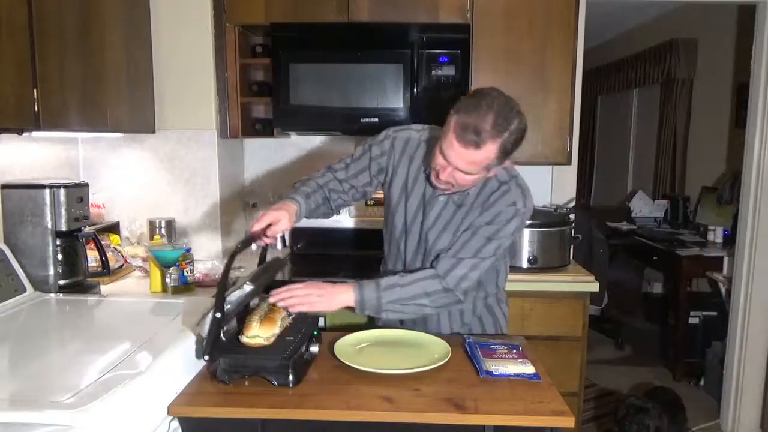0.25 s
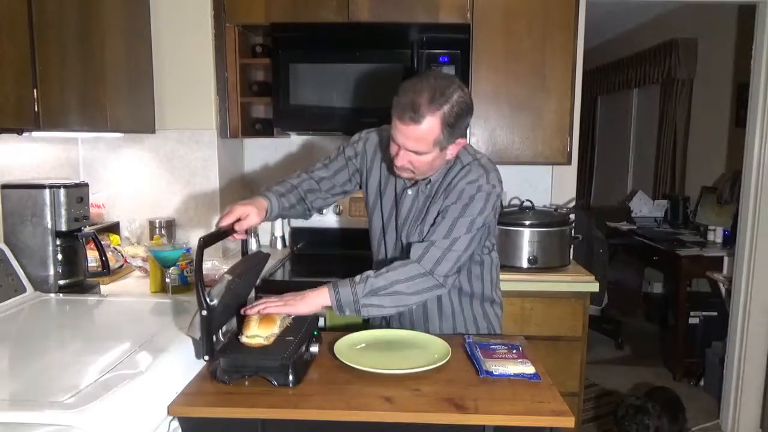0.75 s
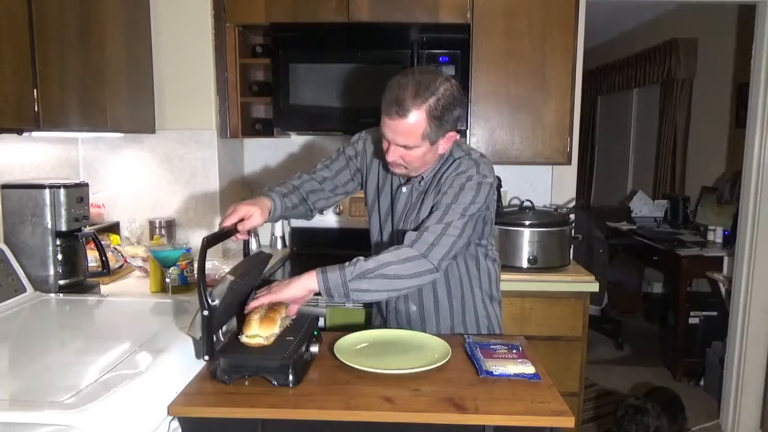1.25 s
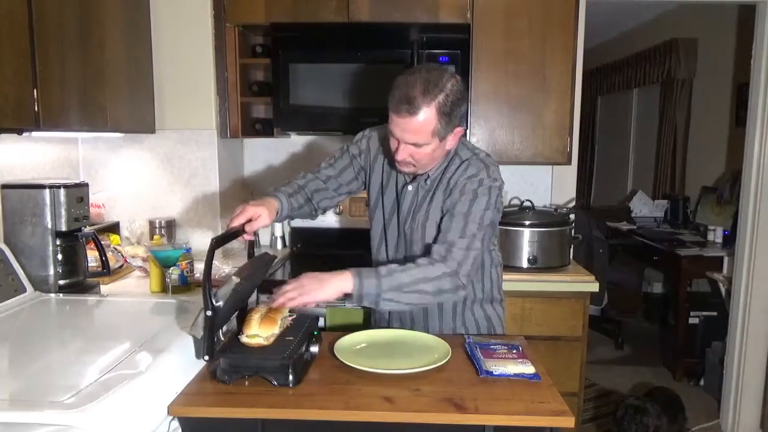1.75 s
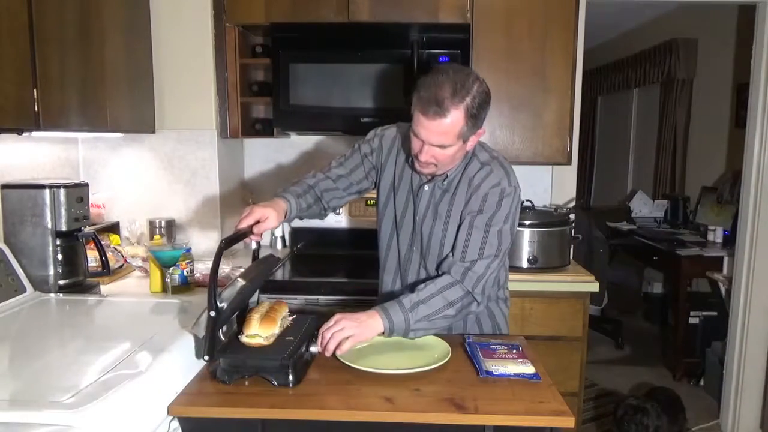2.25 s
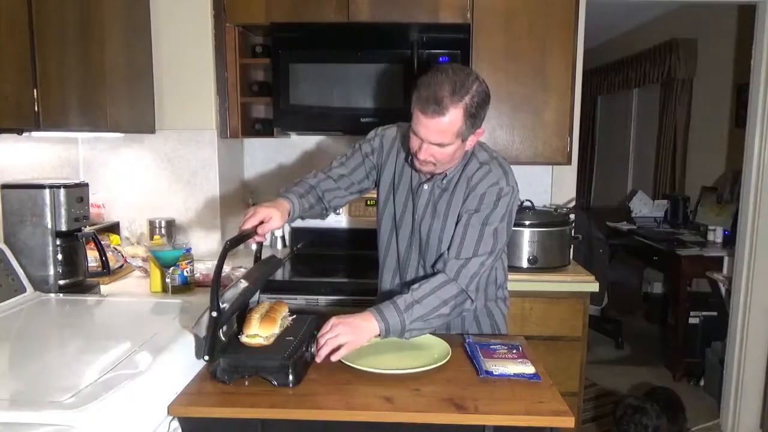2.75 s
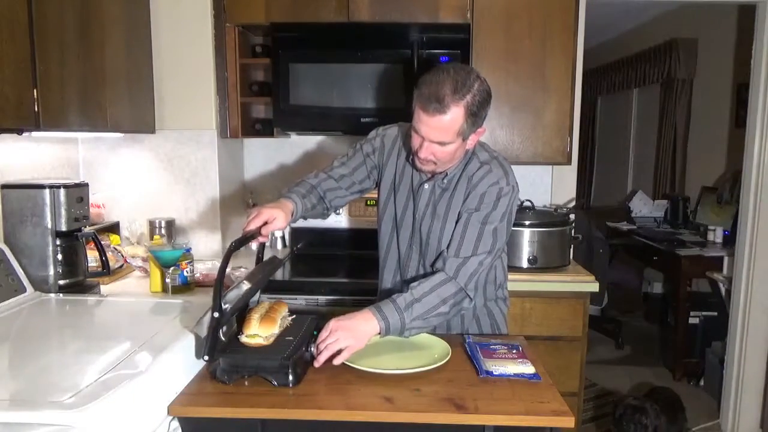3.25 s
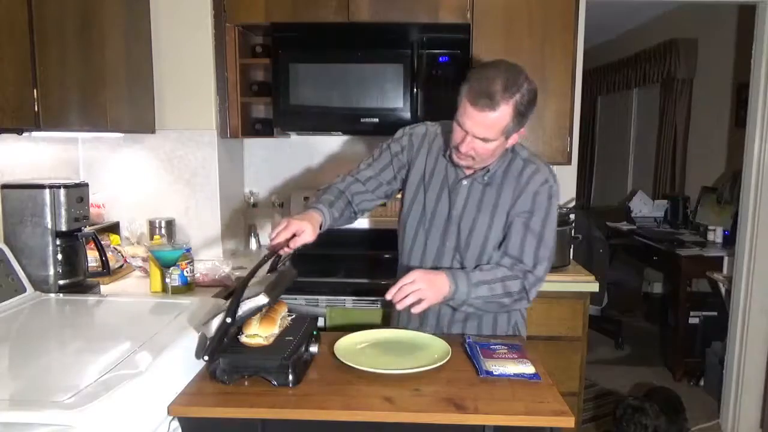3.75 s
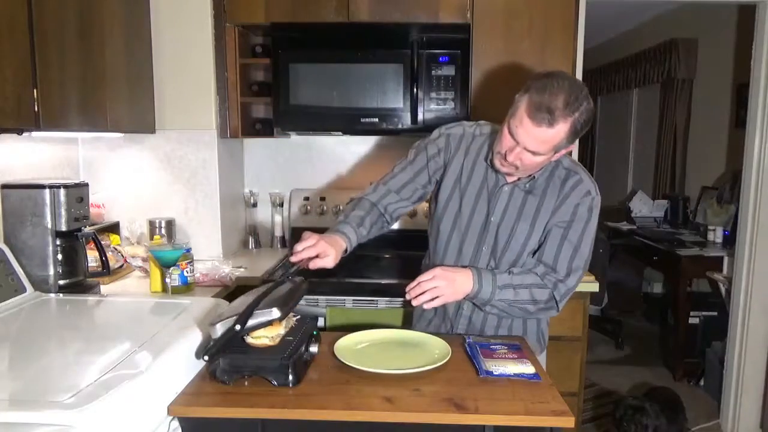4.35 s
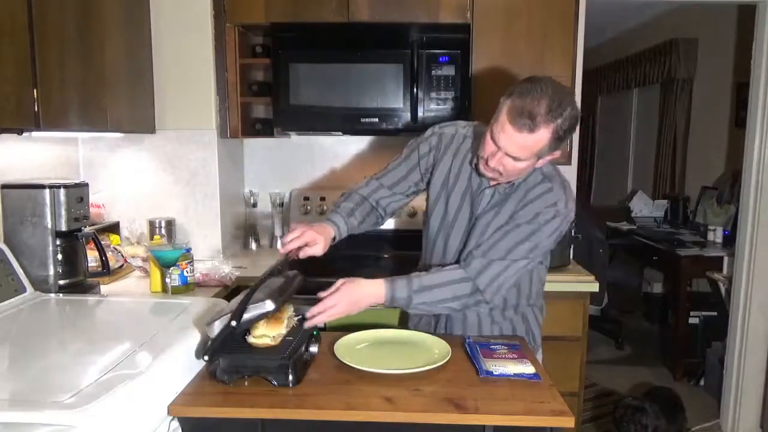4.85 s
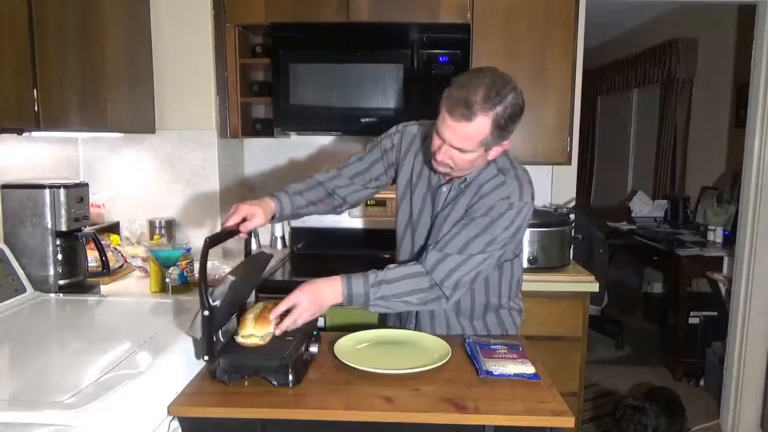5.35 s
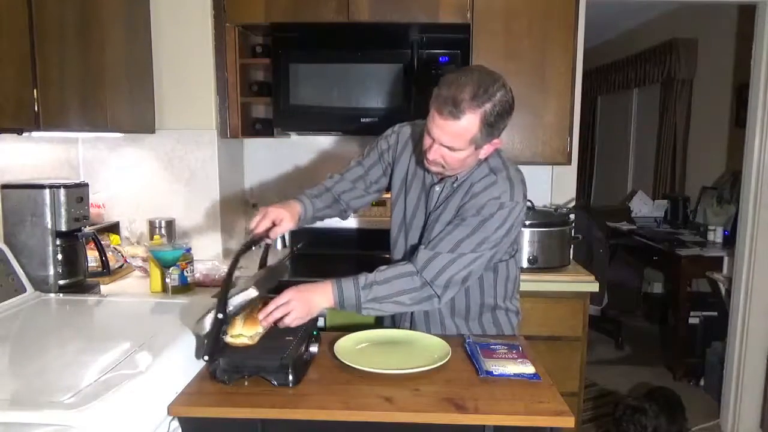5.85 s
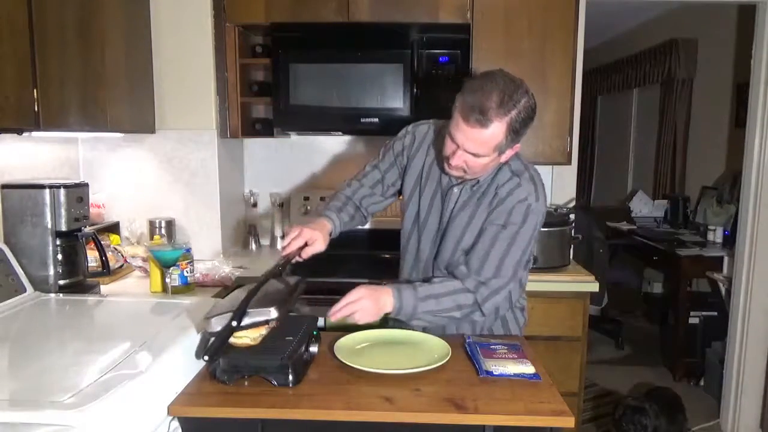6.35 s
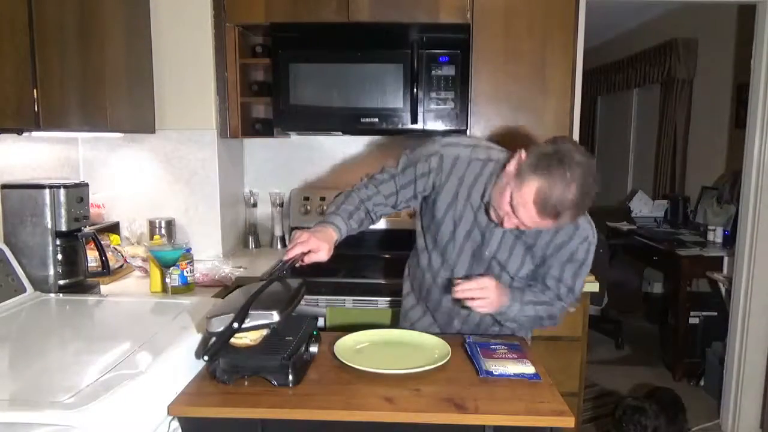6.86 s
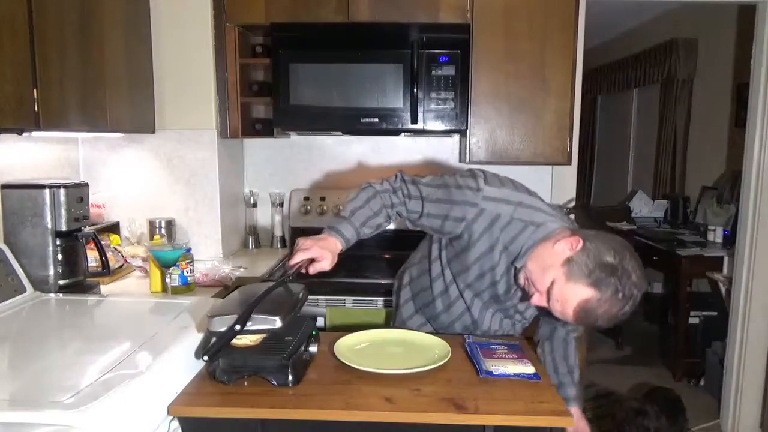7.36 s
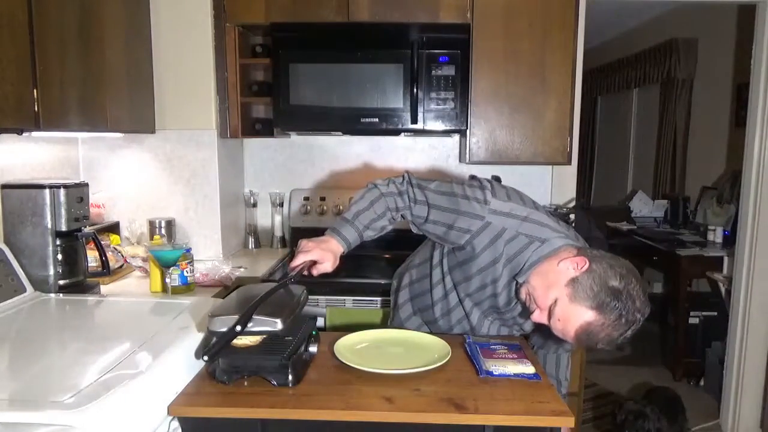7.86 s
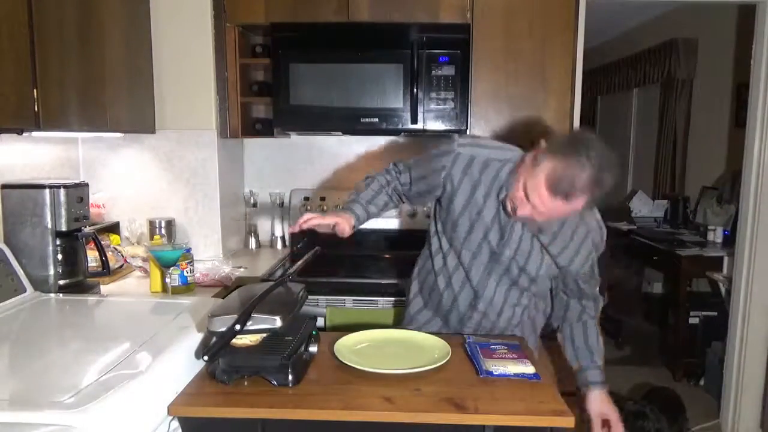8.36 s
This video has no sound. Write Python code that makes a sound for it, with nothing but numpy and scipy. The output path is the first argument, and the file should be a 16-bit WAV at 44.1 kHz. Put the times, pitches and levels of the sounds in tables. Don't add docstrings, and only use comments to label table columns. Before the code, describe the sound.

Heard from about two metres by a small camera whose focus motor chirps very faintly, a sandwich press is handled on a wooden counter. Over constant fan hum come thin clinks, a loud pop, and rapid crisp dial snaps. Then duller lid rattles, a brief metallic ring, soft sizzling and cloth rustle, a second sharp pop, small knocks, and a quiet close with sparse ticks of plastic and fat.

```python
import sys
import numpy as np
from scipy import signal
from scipy.fft import rfft, irfft
from scipy.io import wavfile
from scipy.ndimage import uniform_filter1d

SR = 44100
rng = np.random.default_rng(int(sys.argv[2]) if len(sys.argv) > 2 else 0)


def volts(x):
    e = np.asarray(x, float) / 20
    return 10 ** e


def dump(signal):
    limited = np.clip(np.atleast_2d(signal).T, -1, 1)
    pcm = np.round(limited * 32767).astype(np.int16)
    wavfile.write(sys.argv[1], SR, pcm)


N = 379260
TIME = np.arange(N) / SR
TOP_HZ = 11050
LEFT_RIGHT = np.array([[1], [-1]])


def fade(t, t60):
    return np.exp(-np.log(1000) * t / t60)


def unit(x):
    return x / np.sqrt(np.mean(x ** 2))


def colour(x, points):
    hz, db = np.transpose(points)
    f = np.fft.rfftfreq(x.shape[-1], 1 / SR) + 1
    gain = volts(np.interp(np.log(f), np.log(hz), db))
    return irfft(rfft(x) * gain, x.shape[-1])


def band(x, hz, width_hz):
    edges = np.clip([hz - width_hz / 2, hz + width_hz / 2], 30, .45 * SR)
    return signal.sosfilt(signal.butter(2, edges, "band", fs=SR, output="sos"), x)


def highpass(x, order, hz):
    return signal.sosfilt(signal.butter(order, hz, "high", fs=SR, output="sos"), x)


def walk(rate):
    k = int(SR / rate)
    held = np.repeat(rng.standard_normal(N // k + 1), k)
    return 1.09 * uniform_filter1d(uniform_filter1d(held, k), k)[:N]


# f/Hz, level/dB
STEREO_WIDTH = [(25, -16), (60, -19), (110, -13), (190, -24), (340, -14.5), (610, -10.5), (1090, -5),
                (1940, -4.5), (3460, -5.5), (6160, -8), (11000, -10.5)]


def wide(points):
    mid, side = rng.standard_normal((2, N))
    return unit(colour(mid + colour(side, STEREO_WIDTH) * LEFT_RIGHT, points))


def ring(modes, scatter_db, tilt_db=0, drift=0.021):
    hz, db, t60 = np.transpose(modes)[:, :, None]
    level_chance, pitch_chance, phase = rng.standard_normal((3, len(modes), 1))
    t = TIME[:SR // 8]
    octaves_up = np.log2(np.maximum(hz / 1300, 1))
    gain = volts(db + scatter_db * level_chance + tilt_db * octaves_up)
    tone = np.sin(2 * np.pi * hz * (1 + drift * pitch_chance) * t + phase)
    return np.sum(gain * fade(t, t60) * tone, axis=0)


def burst(noise, points, length_s, tilt_db, rise_s):
    t = TIME[:len(noise)]
    tilted = [(hz, db + tilt_db * max(0, np.log2(hz / 1300))) for hz, db in points]
    return unit(colour(noise, tilted)) * (1 - np.exp(-t / rise_s)) * np.exp(-t / length_s)


def rattle(length_s):
    t = TIME[:SR // 8]
    return rng.laplace(size=len(t)) * np.exp(-t / length_s)


def add(track, s, sound, db):
    i = int(s * SR)
    sound = sound[:N - i]
    track[i:i + len(sound)] += volts(db) * sound / np.abs(sound).max()


# f/Hz, t60/s
OCTAVE_DECAYS = [(125, 0.99), (250, 0.4), (500, 0.49), (1000, 0.35), (2000, 0.41), (4000, 0.34),
                 (8000, 0.29), (14000, 0.047)]


def tail_noise(t):
    return sum(fade(t, t60) * band(rng.standard_normal(len(t)), 1.28 * hz, 0.57 * hz * np.sqrt(2))
               for hz, t60 in OCTAVE_DECAYS)


# t/s, level/dB
NEAR_ECHOES = [(.002, -13), (.0048, -9), (.0073, -23.5)]
# f/Hz, level/dB
TAIL_WIDTH = [(200, -24), (1000, -8.5), (3000, -7.5), (8000, -8)]


def kitchen(both, near, far):
    t = TIME[:SR // 2]
    mid, side = tail_noise(t), tail_noise(t)
    tail = (mid + colour(side, TAIL_WIDTH) * LEFT_RIGHT) * (1 - np.exp(-t / 0.0039))
    tail = signal.sosfilt(signal.ellip(8, .2, 40, TOP_HZ, fs=SR, output="sos"), tail)
    tail = volts(-3.5) * tail / np.sqrt(np.sum(tail ** 2) / 2)
    early = np.zeros((2, SR // 50))
    early[:, 0] = 1
    for k, (s, db) in enumerate(NEAR_ECHOES):
        i = int(s * SR)
        early[[0, 1], [i, i + k % 2]] += volts(db)

    def heard(x, response):
        return signal.fftconvolve(x[None], response, axes=1)[:, :N]

    return heard(both + near, early) + heard(both + far, tail)


# f/Hz, level/dB per Hz
DRAUGHT = [(12, -56), (20, -12), (59, -16.5), (143, -9.5), (178, -7), (198, 3.5), (246, -3.5), (317, -1),
           (409, -7.5), (526, -8.5), (653, -12), (872, -14.5), (1080, -25), (1210, -37), (1500, -32),
           (1950, -68), (3300, -120)]
# f/Hz, rms level/dB, wander/dB
FAN_TONES = [(58.4, -71, 4), (80.9, -65.5, 3), (119.6, -62, -1), (162.3, -61.5, -1), (197, -52.5, 1.5),
             (246, -87, 14), (295.8, -59.5, 0), (318.3, -61, 1), (353.3, -60.5, 2.5), (381.7, -61.5, 3),
             (402.3, -65.5, 0.5), (419.2, -63, 3)]


def fan():
    tones = np.zeros(N)
    for hz, db, wander_db in FAN_TONES:
        level = volts(db + wander_db * walk(9))
        phase = 0.51 * wander_db * walk(5) + rng.uniform(0, 2 * np.pi)
        tones += level * np.sin(2 * np.pi * hz * TIME + phase)
    gusts = volts(.8 * walk(4))
    return np.sqrt(2) * tones + volts(-46.5 - 3.5) * gusts * wide(DRAUGHT)


# start t/s, end t/s, f/Hz, level/dB
FOCUS_HUNTS = [
    (2.1, 2.646, 4060, -63),
    (3.2, 4.5, 4040, -64),
    (4.898, 5.5, 4040, -62),
    (7.667, 7.838, 3320, -58),
    (7.834, 7.91, 3520, -64),
    (7.909, 8.12, 3280, -65),
    (8.118, 8.15, 3450, -59),
    (8.15, 8.174, 3250, -55),
    (8.176, 8.6, 4040, -66),
]


def focus_motor():
    hz, db = np.full(N, 4060.), np.full(N, -61.5)
    for start_s, end_s, hunt_hz, hunt_db in FOCUS_HUNTS:
        span = (TIME >= start_s) & (TIME < end_s)
        hz[span], db[span] = hunt_hz, hunt_db
    frame_hz = 29.97
    frames = TIME * frame_hz - .55 + .5
    index, phase = frames.astype(int), frames % 1 - .5
    count = int(N / SR * frame_hz) + 2
    size = volts(1.6 * rng.standard_normal(count))[index]
    detune = .005 * rng.standard_normal(count)[index]
    hz = hz * (1 + detune - .04 * phase)
    gate = np.exp(-(phase / 0.16) ** 2)
    return volts(db) * size * gate * np.sin(2 * np.pi * np.cumsum(hz) / SR)


# f/Hz, level/dB per Hz
TREBLE_RUSTLE = [(1880, -23), (3200, 0), (4400, 0), (5080, 0.5), (5770, 5), (9570, 5.5), (10900, 4.5),
                 (11400, -23), (14800, -46), (22000, -120)]
# f/Hz, level/dB per Hz
MIDDLE_RUSTLE = [(530, -21), (900, 2.5), (1620, -1), (2980, -4), (3270, -6), (4200, -7), (5460, -9),
                 (9240, -120)]
# t/s at the height, half length/s, swell/dB, coarse share 0-1 (bread against sleeve)
ARM_MOVES = [(.12, 0.14, 6, 0.3), (0.325, 0.13, 4, 0.6), (1.298, 0.12, 1, 0.2), (1.91, 0.24, 3.5, 0.7),
             (2.876, 0.16, 16.5, 0.56), (3.2, 0.12, 9, 0.52), (3.415, 0.53, 3.5, 0.5),
             (3.763, 0.17, 3.5, 0.5), (4.198, 0.2, 5.5, 0.46), (4.463, 0.11, 7.5, 0.3),
             (4.616, 0.046, 17, 0.8), (4.78, 0.14, 13.5, 0.54), (5.093, 0.14, 8, 0.36),
             (5.417, 0.13, 14.5, 0.46), (5.744, 0.11, 4.5, 0.8), (6.095, 0.15, 5, 0.35),
             (6.31, 0.08, 9, 0.5), (6.85, 0.32, 5.5, 0.46), (7.297, 0.13, 1.5, 0.5), (8.303, 0.082, 5, 0.4),
             (8.48, 0.061, 7.5, 0.5)]


def rustle():
    t = TIME[::64]
    treble_db, middle_db = -57.5, -59.5
    for s, half_s, db, coarse in ARM_MOVES:
        swell_db = db * np.exp(-((t - s) / half_s) ** 2)
        treble_db = treble_db + (1 - coarse) * swell_db
        middle_db = middle_db + coarse * swell_db
    treble_db, middle_db = np.interp(TIME, t, treble_db), np.interp(TIME, t, middle_db)
    grain = volts(.6 * walk(30) + 1.5 * walk(300))
    treble = volts(treble_db - 1.5) * wide(TREBLE_RUSTLE)
    middle = volts(middle_db + .7 * walk(12)) * wide(MIDDLE_RUSTLE)
    return grain * treble + middle


# t/s at the height, half length/s, level/dB, centre f/Hz, width/Hz
SIZZLE_PATCHES = [(4.33, 0.092, -66, 9000, 3000), (5.053, .04, -60, 5850, 1500),
                  (5.083, 0.13, -59, 9250, 2600), (5.167, .05, -63, 6000, 1500),
                  (5.327, .06, -57, 8800, 2600), (5.35, .05, -58.5, 4470, 1500),
                  (5.47, .05, -68, 8800, 3000), (6.098, .04, -59, 5860, 1500), (7.51, .15, -62, 8800, 3000),
                  (8.453, .15, -67, 9500, 3000), (8.466, 0.037, -59.5, 2800, 1800)]


def sizzle():
    out = np.zeros((2, N))
    for s, half_s, db, hz, width_hz in SIZZLE_PATCHES:
        i, t = int((s - .4) * SR), np.arange(-.4, .4, 1 / SR)
        mid, side = rng.laplace(size=(2, len(t)))
        hiss = unit(band(mid + 0.22 * side * LEFT_RIGHT, hz, width_hz))
        patch = hiss * np.exp(-(t / half_s) ** 2)
        out[:, i:i + len(t)] += volts(db) * patch[:, :N - i]
    return out


# t/s, peak level/dB, centre f/Hz, share that reaches the walls 0-1
PLASTIC_SNAPS = [(0.039, -34, 8600, 0.6), (0.72, -31, 9940, 0.8), (1.821, -28, 9500, 0.3),
                 (1.9293, -41, 8000, 0.7), (3.635, -36.5, 8500, 0.9), (3.8827, -29, 8800, 0.7),
                 (3.909, -31, 6800, 0.8), (3.977, -35.5, 7100, 0.33), (4.4478, -31, 8050, 0.5),
                 (4.798, -24, 7260, 0.5), (5.393, -30, 8850, 0.5), (6.27, -43, 4000, 0.5),
                 (6.316, -30, 10500, 0.7), (7.2328, -33.5, 7750, 0.8), (7.9883, -36.5, 8350, 0.7)]
# t/s, peak level/dB, centre f/Hz
FAT_SPITS = [(0.098, -43, 7500), (0.357, -45, 7000), (0.6784, -46, 7940), (0.793, -42, 7200),
             (1.265, -39, 6940), (1.3705, -42, 8230), (1.5737, -43, 7300), (1.6102, -42, 8210),
             (3.325, -41, 8500), (3.345, -41, 7000), (3.39, -42.5, 4500), (3.835, -46, 6100),
             (3.9595, -45, 7040), (4.0427, -41, 9000), (4.0876, -44, 5000), (4.3106, -41, 8680),
             (4.3535, -42, 7050), (4.7212, -39, 8000), (4.7294, -43, 6830), (4.9521, -41, 9000),
             (4.962, -43, 9010), (4.974, -37, 9190), (4.982, -39, 9480), (5.3023, -45, 9400),
             (6.0581, -48, 6200), (6.084, -45, 5800), (6.11, -45, 5800), (6.2345, -42, 6000),
             (6.361, -39, 9500), (7.727, -39.5, 8050), (7.962, -45, 8500), (8.0558, -42, 8050),
             (8.481, -44, 8090)]
HINGE_POPS = [
    (1.925, -13, 900),
    (6.2612, -15, 900),
]


def ticks():
    open_air, shaded = np.zeros((2, N))
    t = TIME[:600]
    rows = [(*row, 1.0) for row in PLASTIC_SNAPS]
    rows += [(*row, 0.7, 0.89) for row in FAT_SPITS]
    for s, db, hz, share, relative_width in rows:
        splutter = .09 * rng.standard_normal(600) * np.exp(-t / .0009)
        snap = signal.unit_impulse(600) + splutter
        snap = band(band(snap, hz, hz * relative_width), hz, hz * relative_width)
        add(open_air, s, -snap, db + 7 + 20 * np.log10(share))
        add(shaded, s, -snap, db + 6 + 20 * np.log10(1 - share))
    for s, db, low_hz in HINGE_POPS:
        add(open_air, s, band(signal.unit_impulse(600), low_hz + 8000, 14700), db)
    return open_air, shaded


# t/s, peak level/dB, f/Hz, t60/s
LONE_RINGS = [(0.0732, -38, 2480, .02), (0.0734, -45, 3150, .012), (0.264, -42, 960, 0.062),
              (1.726, -53, 1460, 0.3), (1.73, -41, 850, 0.08), (1.74, -54, 5700, 0.27),
              (1.9253, -28, 9960, .012), (4.5812, -27, 2730, 0.023), (4.582, -29, 1063, 0.13),
              (4.584, -34, 935, 0.22), (4.63, -53, 2570, .7)]


def rings():
    out, t = np.zeros(N), TIME[:SR // 3]
    for s, db, hz, t60 in LONE_RINGS:
        add(out, s, fade(t, t60) * np.sin(2 * np.pi * hz * t), db)
    return out


# t/s, peak level/dB, centre f/Hz, width/Hz, length/s
SMALL_CLINKS = [(0.019, -48.5, 3970, 900, 0.004), (0.0711, -39.5, 2650, 1100, 0.0014),
                (0.076, -50, 2600, 1000, 0.012), (0.265, -49, 3300, 900, 0.0076),
                (1.7225, -34, 5900, 1500, 0.0056), (1.723, -38.5, 8750, 600, 0.0053),
                (1.725, -39, 3250, 4000, 0.012), (1.73, -39, 3270, 900, 0.0028),
                (1.906, -53, 2150, 880, 0.0039), (1.923, -42, 3320, 3630, 0.0095),
                (2.575, -48.5, 820, 500, 0.044), (2.576, -54, 2300, 900, 0.004),
                (2.6, -55, 1900, 700, .008), (2.676, -51, 1800, 1500, 0.014),
                (2.732, -35.5, 820, 99, 0.0068), (2.751, -53, 820, 120, .006),
                (2.728, -38.5, 1880, 900, .012), (2.721, -37, 507, 500, 0.0044),
                (3.123, -37.5, 1910, 1400, 0.0037), (3.126, -40, 3000, 3000, 0.0056),
                (3.288, -55.5, 3140, 300, .004), (5.987, -59, 3180, 300, .005),
                (4.385, -36, 4440, 5500, 0.0015), (4.564, -41.5, 330, 298, 0.0088),
                    (4.5805, -39.5, 4520, 2400, 0.015), (4.595, -34, 2900, 500, 0.0045),
                    (4.585, -42, 1900, 900, 0.016), (4.612, -46, 3170, 900, .006),
                    (4.6, -39, 1025, 196, 0.022), (4.64, -53, 2540, 300, 0.06),
                    (5.181, -53, 920, 300, 0.012), (5.583, -49.5, 980, 300, 0.014),
                    (6.26, -45.5, 3600, 4000, 0.02), (6.723, -43, 1290, 1490, 0.0072),
                    (6.725, -48, 1430, 200, 0.016), (6.726, -52, 450, 200, 0.01),
                    (6.87, -50.5, 2050, 350, 0.0074), (6.888, -51, 2260, 500, .015),
                    (6.87, -60, 4340, 400, 0.0089), (6.873, -51, 3380, 2600, 0.028)]


def clinks():
    out = np.zeros(N)
    housing = [(s + 0.0074, db - 27.5, 1200, 1200, 0.02) for s, db, _ in DIAL_DETENTS]
    for s, db, hz, width_hz, length_s in [*SMALL_CLINKS, *housing]:
        add(out, s, band(rattle(length_s), hz, width_hz), db + 6)
    return out


# t/s, peak level/dB, rattle length/s, treble slope/dB per octave
LID_KNOCKS = [(0.263, -39, 0.02, 0.5), (0.272, -39, 0.019, -8), (0.284, -47, 0.014, -6),
              (4.041, -46, 0.019, -26), (4.271, -37.5, 0.019, -14), (4.303, -43, 0.017, -10),
              (4.38, -44.5, 0.033, 0), (4.582, -31.5, 0.0076, -6), (4.595, -28.5, 0.016, -13),
              (4.61, -30, 0.02, -11), (4.631, -38, 0.032, -13), (4.985, -40.5, 0.017, -12),
              (5.014, -51, 0.023, -23), (5.181, -46.5, 0.01, -9), (5.573, -48, 0.016, -8),
              (6.234, -41.5, 0.013, -2), (6.247, -36.5, 0.015, -39), (6.277, -44, 0.0055, -27),
              (6.406, -41, 0.018, -45), (6.724, -40.5, 0.0064, -20), (6.73, -43, 0.013, -17)]
# f/Hz, level/dB per Hz
DENSE_MODES = [(71, -46), (120, -40), (192, -11.5), (318, -4.5), (374, 0.5), (680, -13.5), (1050, -8.5),
               (1170, -16), (1710, -9), (2200, -14), (2990, -14), (3710, -15.5), (9000, -24.5),
               (11700, -69), (19800, -120)]
# f/Hz, level/dB, t60/s
BODY_MODES = [(171, 4.5, 0.087), (205, 0, 0.068), (270, -8, 0.054), (375, -7, 0.14), (453, -22, 0.035),
              (518, 2, 0.037), (621, 6.5, 0.085), (766, 4.5, 0.07), (900, 7.5, 0.057), (1080, -21, 0.019),
              (1270, -27, 0.024), (1460, -16, .03), (1710, 5, 0.026), (2110, 3, .02)]


def knocks():
    out = np.zeros(N)
    for s, db, length_s, tilt_db in LID_KNOCKS:
        thud = burst(rng.standard_normal(SR // 8), DENSE_MODES, length_s, tilt_db, 0.0013)
        add(out, s, thud, db + 3.5)
        blow = ring(BODY_MODES, scatter_db=3.0, tilt_db=tilt_db)
        add(out, s, signal.fftconvolve(rattle(length_s / 2), blow), db + 0.5)
    return highpass(out, 3, 150)


# f/Hz, level/dB per Hz
WALL_COLOUR = [(1800, -35), (2700, -0.5), (4240, 4), (6300, 0.5), (7300, 7.5), (8300, -4.5), (10000, 1.5),
               (11500, -37)]


def dial_wash():
    out, click = np.zeros(N), colour(signal.unit_impulse(2048, "mid"), WALL_COLOUR)
    for s, db, _ in DIAL_DETENTS:
        add(out, s - 1024 / SR + .0014, click, db + 9)
    return out


# t/s, peak level/dB, brightness/dB per octave
DIAL_DETENTS = [
    (2.6893, -16.5, 4.5),
    (2.7251, -16, 3),
    (2.7575, -16, 5),
    (2.835, -15.5, 3),
    (2.8701, -15, 3.5),
    (2.9553, -15, 2.5),
    (3.1242, -16, 3.5),
]
# f/Hz, level/dB per Hz
SPRING_CRACK = [(880, -27), (1500, 4), (2000, -3), (2200, -22), (2540, -8.5), (3030, 0), (3360, -5),
                (4720, -11), (5050, -8), (5450, 2), (6790, -6), (7330, -5), (7910, -7), (9870, -6.5),
                (11400, -16), (14800, -9.5), (22000, -120)]
# f/Hz, level/dB, t60/s
PANEL_MODES = [(1500, -12, 0.02), (2100, -14, 0.012), (2850, -6, 0.012), (3300, -8, 0.008),
               (3690, -14, 0.006), (4240, 1, 0.013), (4830, -6, 0.008), (5480, -1, 0.009), (6300, -2, .008),
               (7230, -3, 0.022), (7420, -3, 0.025), (8700, -4, 0.008), (9380, -3, 0.008),
               (10300, -6, .006)]


def dial():
    out, spring = np.zeros(N), rng.standard_normal(SR // 20)
    spring[20] += 5
    for s, db, tilt_db in DIAL_DETENTS:
        noise = spring + 0.83 * rng.standard_normal(SR // 20)
        crack = burst(noise, SPRING_CRACK, 0.0012, tilt_db, 0.00053)
        chatter = burst(noise, SPRING_CRACK, 0.0029, tilt_db, 0.0011)
        add(out, s, crack + volts(-10) * chatter, db + 5.5)
        panel = ring(PANEL_MODES, scatter_db=2.5, tilt_db=tilt_db, drift=0.01)
        add(out, s + 0.00044, panel, db - 3)
    return highpass(out, 6, 2600)


def scene():
    open_air, shaded = ticks()
    both = open_air + clinks() + knocks() + rings()
    press = kitchen(both=both, near=dial(), far=dial_wash()) + shaded
    surroundings = rustle() + fan() + sizzle()
    return press * volts(.45 * LEFT_RIGHT) + surroundings * volts(.15 * LEFT_RIGHT) + focus_motor()


def low_pass(x):
    return signal.sosfilt(signal.butter(12, 15000, fs=SR, output="sos"), x)


def record(dry):
    dry = highpass(dry, 2, 45)
    cut = signal.sosfilt(signal.ellip(10, .2, 20, TOP_HZ, fs=SR, output="sos"), dry)
    return low_pass(cut)


dry = scene()
out = record(dry)
dump(out)
```